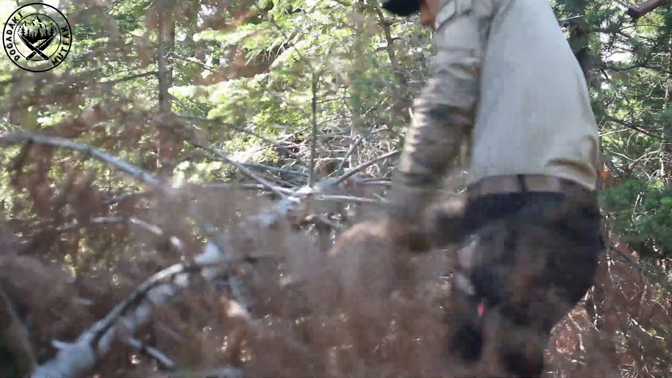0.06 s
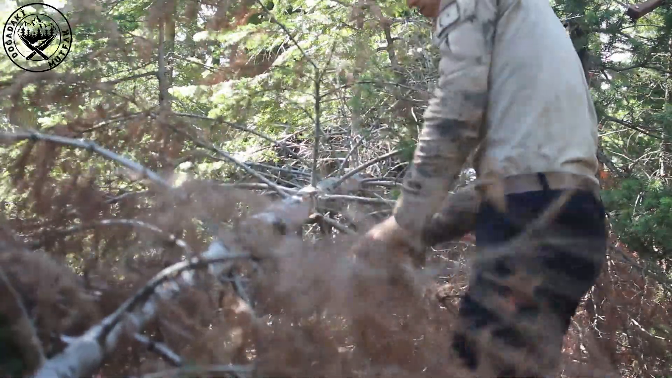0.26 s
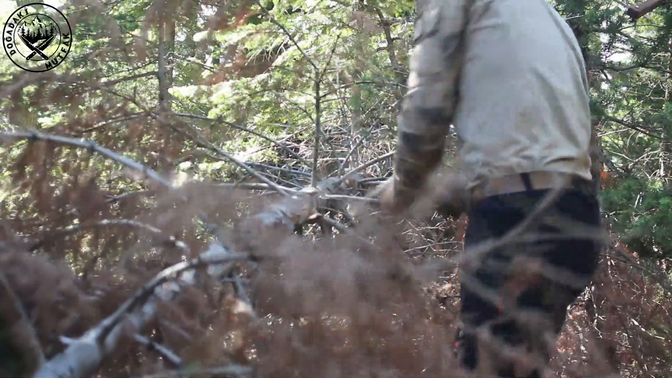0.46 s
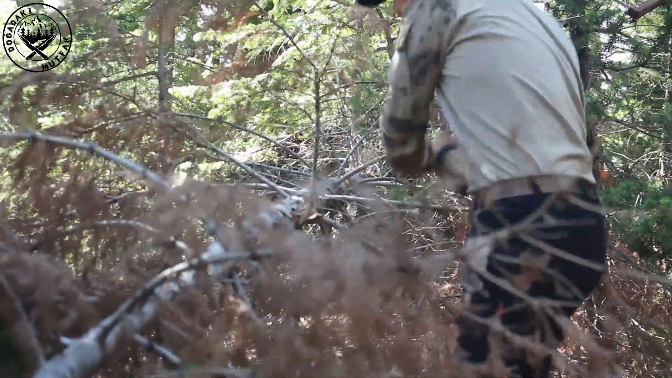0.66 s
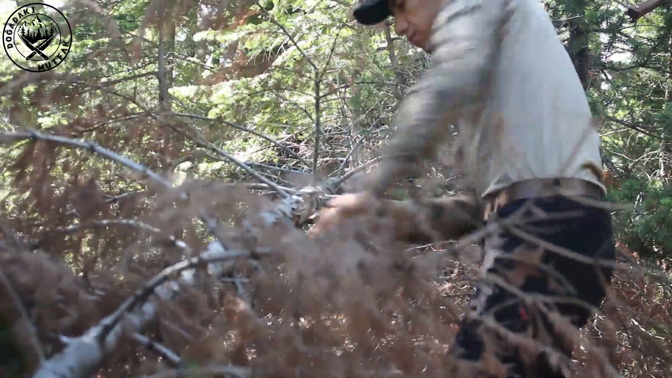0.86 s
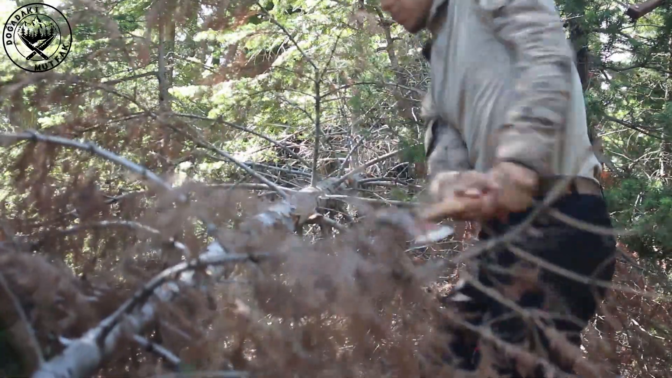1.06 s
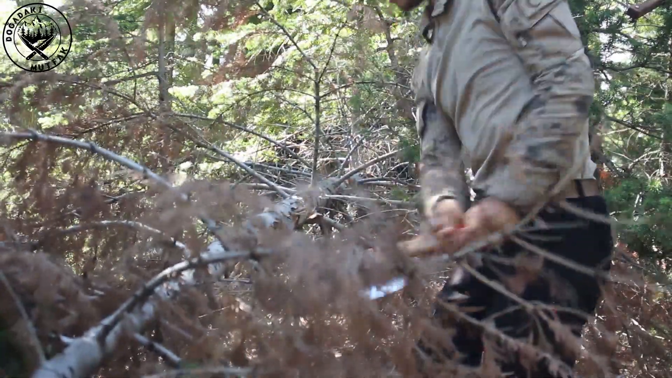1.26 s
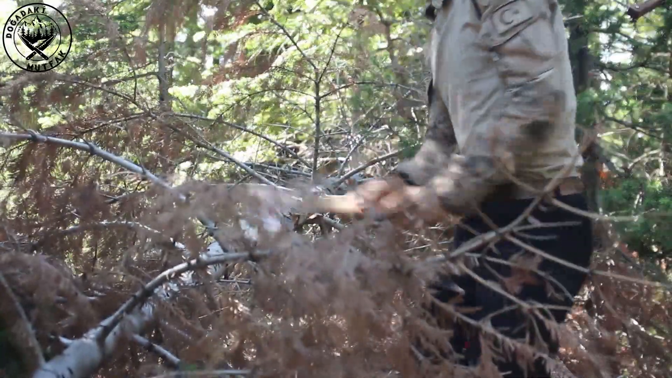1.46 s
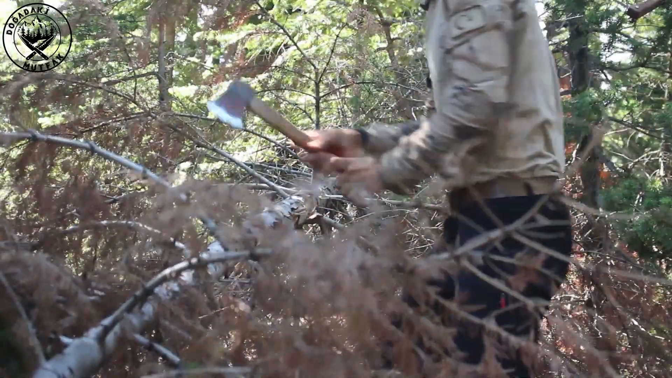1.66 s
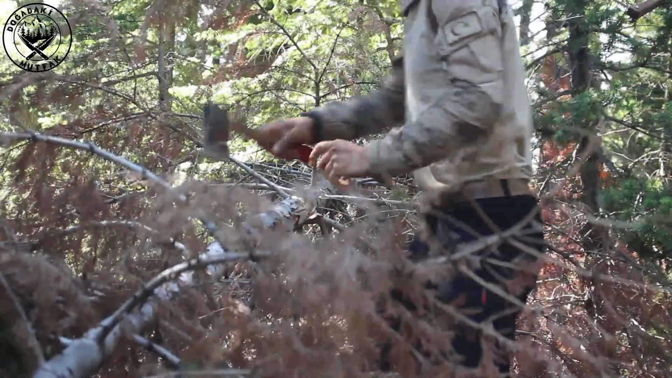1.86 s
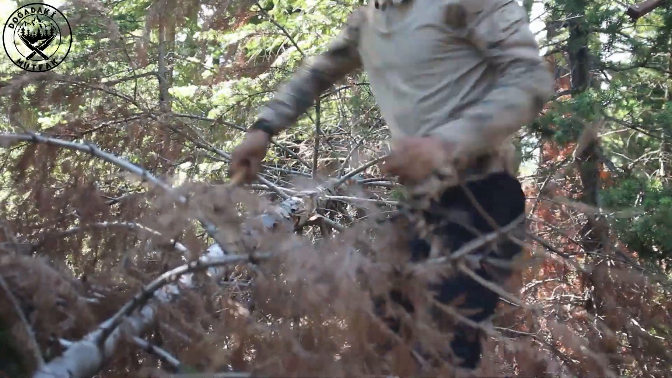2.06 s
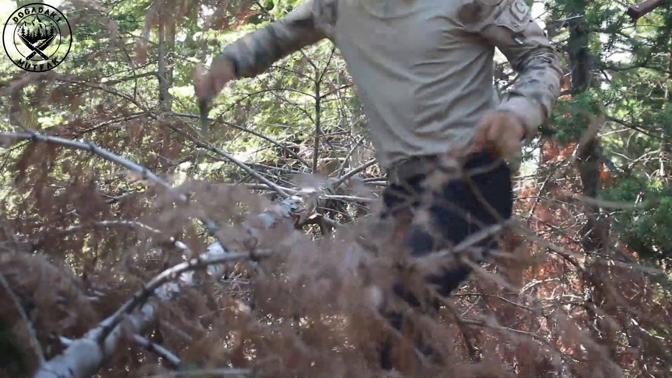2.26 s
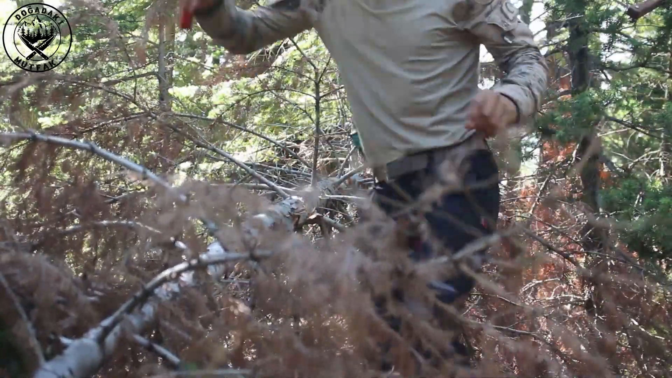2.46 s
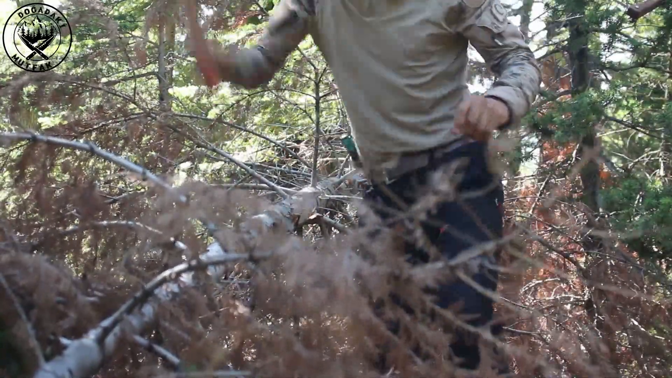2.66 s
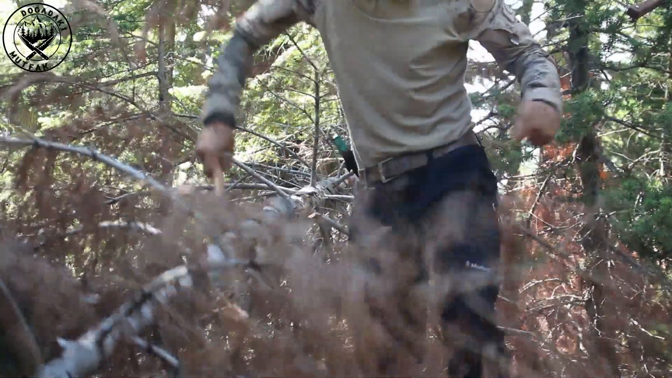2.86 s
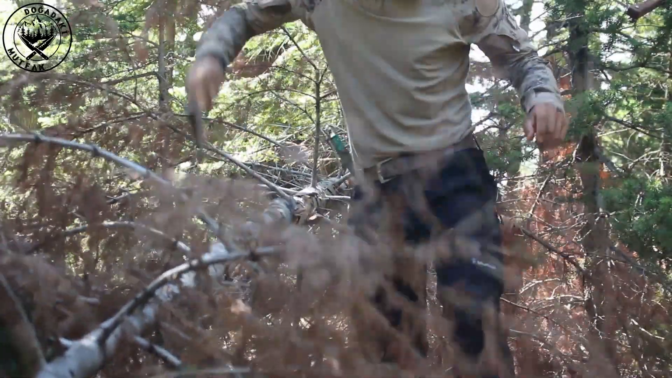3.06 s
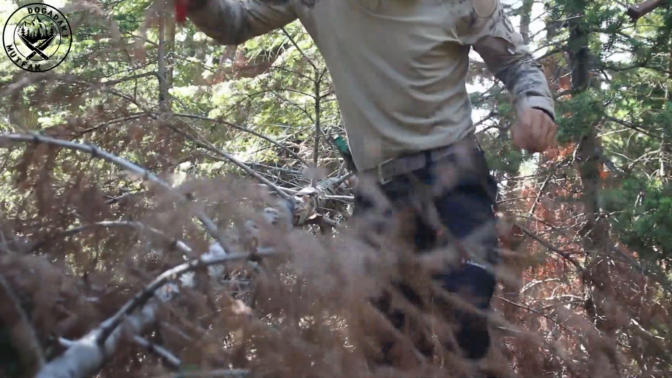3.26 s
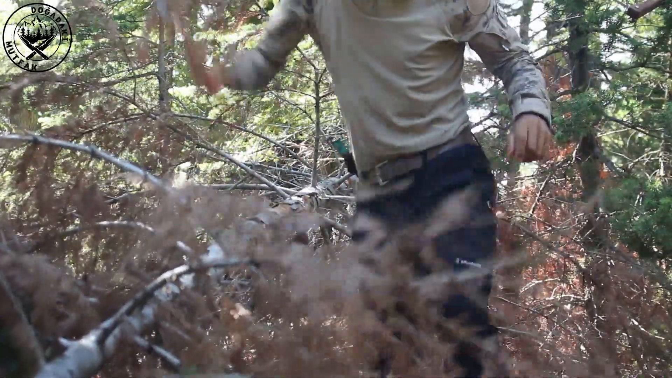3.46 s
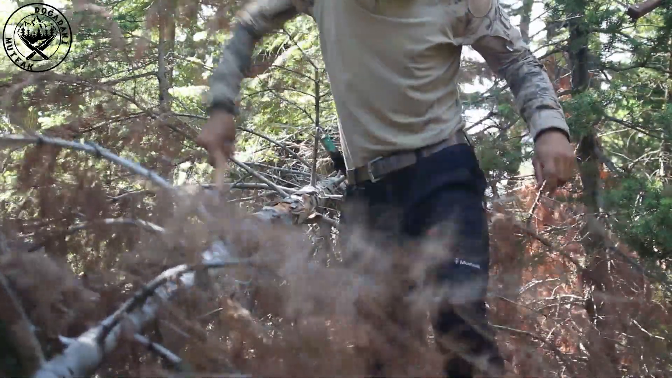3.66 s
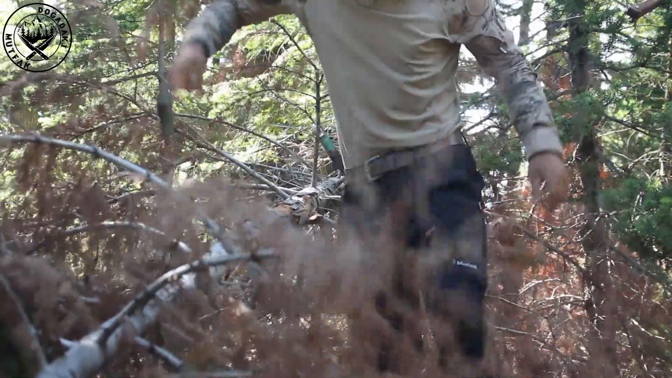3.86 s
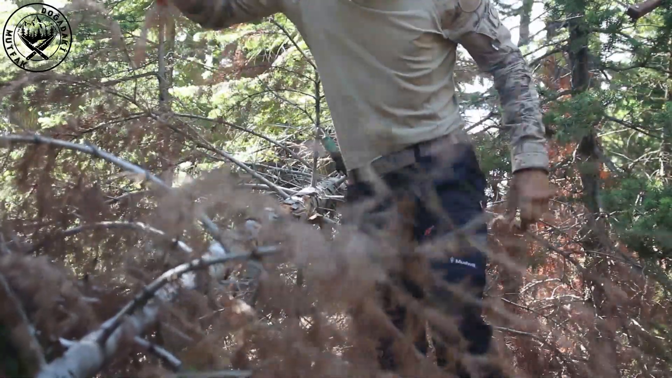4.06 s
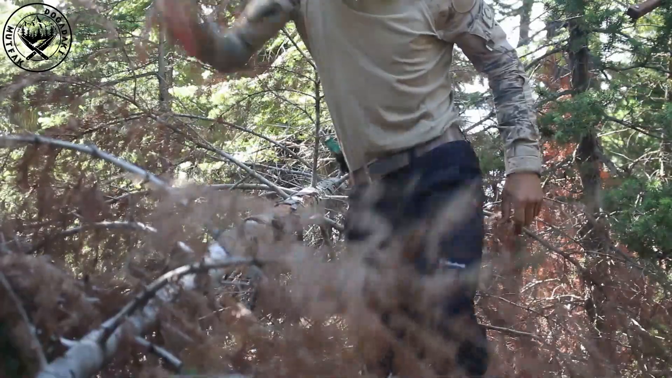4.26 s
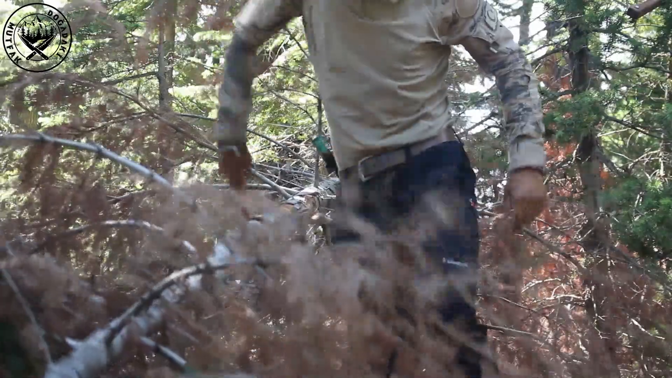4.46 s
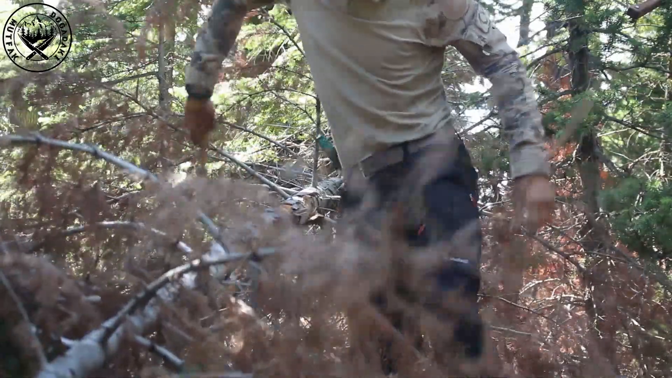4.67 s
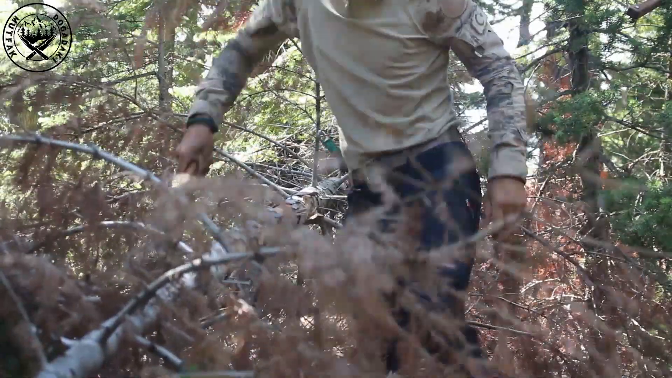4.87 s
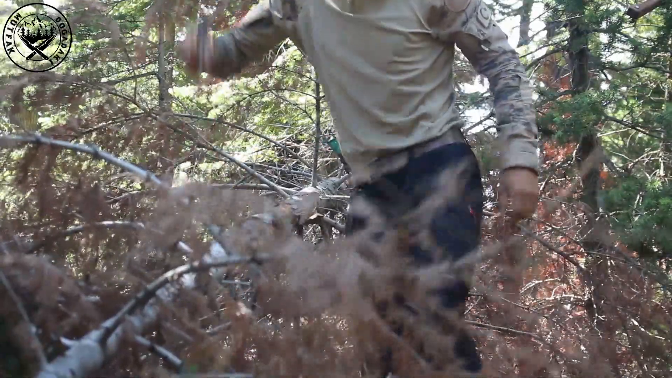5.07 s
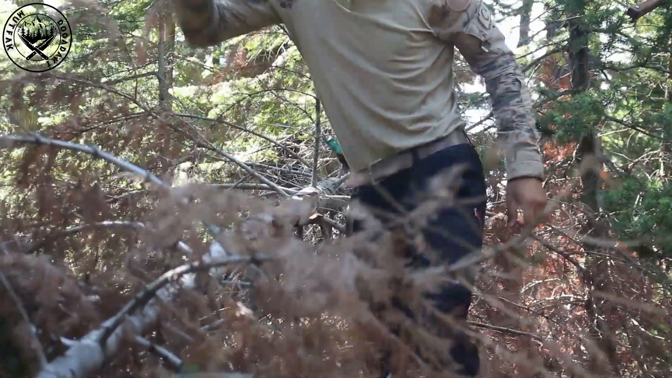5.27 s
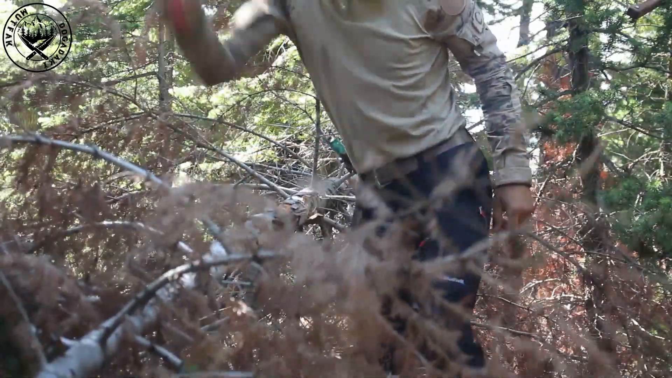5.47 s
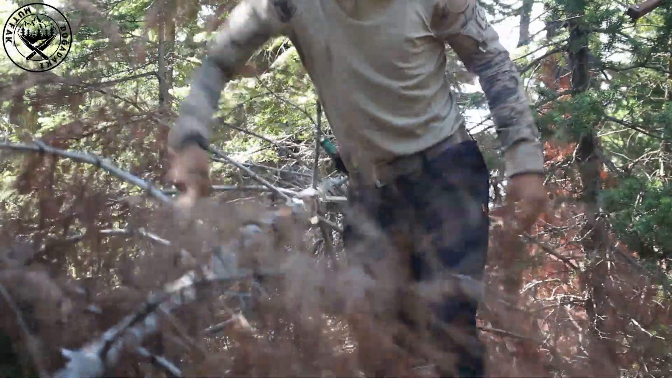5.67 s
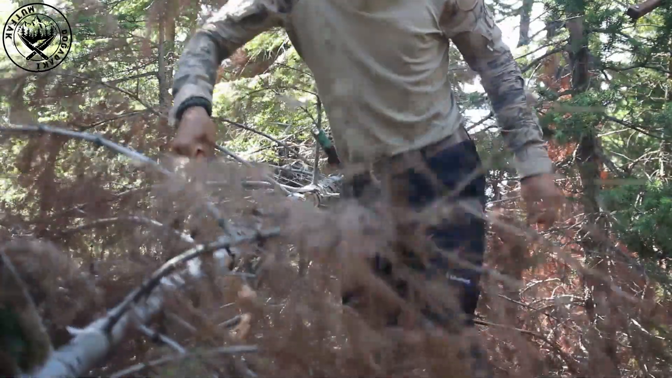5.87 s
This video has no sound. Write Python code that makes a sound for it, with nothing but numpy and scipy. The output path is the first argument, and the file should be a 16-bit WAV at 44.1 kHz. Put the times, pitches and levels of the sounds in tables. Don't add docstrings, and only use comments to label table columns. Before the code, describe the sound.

Six hard, cracking hatchet chops on a dry fallen tree echo briefly among trunks, with small twig snaps, ticking chips and thin bird whistles.

```python
import sys
import numpy as np
from scipy import signal
from scipy.io import wavfile
from scipy.ndimage import uniform_filter1d

SR = 44100
rng = np.random.default_rng(int(sys.argv[2]) if len(sys.argv) > 2 else 0)


def gain_from_decibels(decibels):
    exponent = np.asarray(decibels, float) / 20
    return 10 ** exponent


def store_wav(level_fs):
    pcm = np.round(np.clip(np.atleast_2d(level_fs), -1, 1) * 32767)
    wavfile.write(sys.argv[1], SR, pcm.T.astype(np.int16))


N = 260631

BANDS_HZ = 22 * 2 ** np.arange(0, 10, .5)
# f/Hz, level/dB, t60/s
HEAD_MODES = [(3680, -31, .3), (3790, -35, .2), (4690, -37, .2), (7860, -39, .3), (7990, -41, .25)]
# t/s, level/dB, wood resonance f/Hz, resonance level/dB, steel level/dB
SENT_ROUND = [
    (.106, 9, 1580, 5.5, 0),
    (.165, -11, 1510, 15, -4),
    (0.967, 7, 1480, 10, 2),
    (2.848, 11, 1230, 2.5, -11.5),
    (3.634, 10.5, 1250, 8, -11),
    (4.469, 10.5, 875, -9, -8),
    (5.676, 11, 1400, 5.5, -4.5),
]


def at_hz(points, hz):
    points = np.array(points)
    return np.interp(np.log(hz), np.log(points[:, 0]), points[:, 1])


def band(x, low_hz, high_hz):
    edges_hz = [max(low_hz, 15), min(high_hz, SR * .45)]
    return signal.sosfilt(signal.butter(2, edges_hz, "band", fs=SR, output="sos"), x)


def resonance(x, hz, q):
    return signal.lfilter(*signal.iirpeak(hz, q, fs=SR), x)


def dulled(x, hz):
    return signal.lfilter(*signal.butter(1, hz, fs=SR), x)


def drift(rate_hz):
    points = rng.standard_normal(500)
    return np.interp(np.arange(N) / SR * rate_hz, np.arange(500), points)


def pair(mid, side, alike):
    alike = np.clip(alike, -1, 1)
    return np.sqrt((1 + alike) / 2) * mid + np.sqrt((1 - alike) / 2) * side * [[1], [-1]]


def add(track, s, sound):
    i = int(s * SR)
    track[..., i:i + sound.shape[-1]] += sound[..., :N - i]


def banded(spectrum, sources, likeness, patchy_db):
    out = 0
    for k, (low_hz, high_hz) in enumerate(zip(BANDS_HZ, BANDS_HZ[1:])):
        hz = np.sqrt(low_hz * high_hz)
        mid, side = band(sources[k % 2], low_hz, high_hz)
        level = gain_from_decibels(at_hz(spectrum, hz) + patchy_db * drift(5.2))
        out = out + level * pair(mid, side, at_hz(likeness, hz))
    return out / np.sqrt(np.mean(out.mean(axis=0) ** 2))


def wind():
    # f/Hz, density/dB
    wind_colour = [(18, -22), (30, -25), (64, -9), (189, -7), (371, -4), (1120, -10.5), (2000, -15),
                   (15800, -29.5)]
    # f/Hz, left-right likeness
    wind_likeness = [(60, -0.115), (240, 0.25), (950, 0.24), (3770, -0.14), (15000, -0.37)]
    sources = rng.standard_normal((2, 2, N))
    return gain_from_decibels(-49.5 - 5.5) * banded(wind_colour, sources, wind_likeness, patchy_db=-2.3)


def rustle():
    # t/s, level/dB
    stirring = [(0.0, -68), (0.57, -63.5), (0.85, -69.5), (1.5, -69), (1.78, -63), (1.94, -64),
                (2.08, -58.5), (2.25, -61.5), (2.4, -68.5), (2.55, -64), (2.85, -70), (3.42, -64.5),
                (3.7, -77), (4.28, -67.5), (4.84, -65), (5.05, -67.5), (5.27, -78), (5.91, -66.5)]
    # f/Hz, density/dB
    needle_colour = [(180, -25), (300, -5), (354, -6), (543, -1), (650, 2), (1070, -1.5), (4720, -1.5),
                     (15500, -19.5)]
    chance = 1800 * gain_from_decibels(3.0 * drift(14)) / SR
    clicks = rng.random((2, 1, N)) < chance
    clicks = clicks * gain_from_decibels(3.2 * np.minimum(rng.exponential(1, (2, 1, N)), 2.5))
    sources = rng.standard_normal((2, 2, N)) * (0.21 + clicks)
    stir_s, stir_db = np.transpose(stirring)
    level = gain_from_decibels(np.interp(np.arange(N) / SR, stir_s, stir_db))
    shake_db, shake_peak_s, sharpness = -77, 0.11, 0.96
    u = np.arange(SR) / SR / shake_peak_s
    shake = (u * np.exp(1 - u)) ** sharpness
    for s, db, *_ in SENT_ROUND:
        add(level, s, gain_from_decibels(db + shake_db) * shake)
    likeness = [(300, 0.96), (12000, 0.39)]
    return level * gain_from_decibels(9.5) * banded(needle_colour, sources, likeness, patchy_db=2.0)


def fractures(rows, grain_db, alike, woody_db):
    out, t_ms = np.zeros((2, N)), np.arange(8000) / SR * 1000
    draws = rng.standard_normal((len(rows), 3, 8000))
    for (s, db, hz, octaves, rise_ms, t60_ms), (mid, side, size) in zip(rows, draws):
        grains = gain_from_decibels(grain_db * np.clip(size, -2, 2)) * pair(mid, side, alike)
        decay = gain_from_decibels(-60 * np.maximum(t_ms - rise_ms, 0) / t60_ms)
        shape = np.minimum(t_ms / rise_ms, 1) ** 2 * decay
        shaped = shape * band(grains, hz * 2 ** (-octaves / 2), hz * 2 ** (octaves / 2))
        rms = np.sqrt(np.mean(shaped ** 2) / np.mean(shape ** 2))
        burst = gain_from_decibels(db) * shape * (shaped / np.maximum(shape, 1e-30)) / (2 * rms)
        burst = burst + gain_from_decibels(woody_db) * resonance(burst, hz, 5.0)
        add(out, s, dulled(burst, 9500))
    return out


def staged(*stages):
    return [row + shape for shape, rows in stages for row in rows]


def tearing():
    # width/octaves, rise/ms, t60/ms
    touch_shape = (1.94, 2.5, 23)
    crack_shape = (2.7, 1.4, 20)
    split_shape = (2.63, 3, 78.6)
    crush_shape = (2.36, 4.3, 63)
    sag_shape = (3.06, 6.2, 390)
    # t/s, peak level/dB, centre f/Hz
    touches = [
        (.9480, -27, 1200),
        (2.8420, -13.5, 1770),
        (3.6289, -10.5, 2070),
        (4.4599, -18.5, 1580),
        (5.6700, -17.5, 1800),
        (2.4660, -28, 4070),
    ]
    # t/s, peak level/dB, centre f/Hz
    wood_cracks = [
        (0.1061, -2, 4630),
        (0.1614, -23.5, 8800),
        (0.9523, -15.5, 4170),
        (.9680, -2, 4000),
        (2.8001, -20, 1510),
        (3.6335, -8, 3400),
        (4.4650, -6.5, 5250),
        (4.471, -10.5, 6060),
        (5.676, -16.5, 5300),
    ]
    # t/s, peak level/dB, centre f/Hz
    splits = [
        (0.0984, -13.5, 2890),
        (.1110, -16.5, 3020),
        (0.1592, -21, 3000),
        (.9580, -11.5, 2480),
        (.9720, -18.5, 3300),
        (2.088, -28.5, 3780),
        (2.8471, -14, 3770),
        (3.632, -16, 2200),
        (4.4640, -11.5, 1390),
        (5.676, -16.5, 2280),
    ]
    # t/s, peak level/dB, centre f/Hz
    crushes = [(.1030, -12.5, 633), (.9670, -17, 444), (2.0920, -30, 880), (2.469, -29, 2200),
               (2.846, -14, 533), (3.6310, -13, 570), (5.6744, -6.5, 730), (.9620, -16, 800),
               (4.4700, -16, 300), (2.1040, -29.5, 250), (2.4400, -38.5, 607), (2.497, -32.5, 704)]
    # t/s, peak level/dB, centre f/Hz
    sags = [
        (0.166, -23.5, 2540),
        (2.802, -43, 3000),
        (4.4850, -27.5, 835),
    ]
    rows = staged((touch_shape, touches), (crack_shape, wood_cracks), (split_shape, splits),
                  (crush_shape, crushes), (sag_shape, sags))
    return fractures(rows, grain_db=2.0, alike=0.8, woody_db=3.5)


def bending(rows, narrow, wobble):
    out, t = np.zeros(N), np.arange(4000) / SR
    sink_octaves_per_ms, sink_at_hz = 0.038, 260
    draws = rng.standard_normal((len(rows), 2, 200))
    for (s, db, hz, swell_ms), (pitch, size) in zip(rows, draws):
        cycle = np.minimum(t * hz, 199)
        u = t * 1000 / swell_ms
        uneven = wobble * np.interp(cycle, np.arange(200), pitch)
        sunk = np.minimum(sink_octaves_per_ms * sink_at_hz / hz * t * 1000, 1.3)
        phase = 2 * np.pi * np.cumsum(hz * 2 ** (uneven - sunk)) / SR
        strength = gain_from_decibels(db + 18.7 * wobble * np.interp(cycle, np.arange(200), size))
        add(out, s, strength * (u * np.exp(1 - u)) ** narrow * np.sin(phase))
    return out


def wood_knocks():
    # t/s, peak level/dB, f/Hz, swell/ms
    bites = [(.1018, -12, 1360, 1.8), (.1050, -17, 880, 2.9), (.1065, -1.5, 2080, 0.94),
             (.1090, -15, 1340, 2.5), (.1585, -18, 1560, 0.99), (.1605, -13, 590, 1.5),
             (.9640, -8.5, 1400, 2.5), (.9690, -14.5, 1176, 3.2), (.9730, -6, 1600, 1.13),
             (.9810, -27, 1400, 3), (1.854, -31, 470, 1.6), (2.0520, -21, 514, 1.45),
             (2.0585, -33.5, 490, 1), (2.0955, -22, 295, 2.6), (2.8440, -9.5, 1356, 3.1),
             (2.8485, -10.5, 1190, 2.1), (2.8520, -12.5, 1500, 1.9), (2.8475, -11.5, 289, 4.3),
             (3.6298, -6.5, 1207, 3.2), (3.6335, -0.5, 1270, 0.98), (3.6375, -11, 1400, 3.3),
             (4.4632, -10, 619, 3.1), (4.4690, -32, 1567, 2), (4.4790, -12.5, 427, 3.1),
             (4.545, -31, 703, 6.3), (5.6720, -7, 1306, 1.8), (5.6765, -8.5, 1344, 2),
             (5.6770, -9.5, 456, 0.8), (1.716, -47, 4800, 5.6), (1.8655, -35.5, 2150, 2.8)]
    return bending(bites, narrow=3.2, wobble=.06)


def trunk_thumps():
    # t/s, peak level/dB, f/Hz, swell/ms
    trunk_waves = [(.102, -16.5, 350, 1.64), (.116, -24, 260, 9), (.170, -27, 245, 8.8),
                   (.975, -24, 326, 3.7), (2.104, -29, 326, 11), (2.438, -40.5, 228, 8.8),
                   (2.494, -29, 260, 3.9), (2.856, -19, 251, 11.3), (3.646, -19, 239, 7.1),
                   (4.480, -30.5, 240, 9.5), (5.686, -11.5, 243, 9.2)]
    return bending(trunk_waves, narrow=3.55, wobble=0.19)


def steel():
    # t/s, level/dB, free ringing/s
    head_blows = [
        (.107, 2, 0.054),
        (.969, -3, 0.1),
        (2.85, -12, 0.089),
        (3.635, -22, 0.078),
        (4.468, -6, .05),
        (5.678, -23, 0.055),
    ]
    out, t = np.zeros(N), np.arange(12000) / SR
    ring = sum(gain_from_decibels(db - 60 * t / t60_s) * np.sin(2 * np.pi * hz * t) for hz, db, t60_s in HEAD_MODES)
    for s, db, free_s in head_blows:
        damping_db = 3000 * np.maximum(t - free_s, 0)
        add(out, s, gain_from_decibels(db - damping_db) * ring)
    return out


def sent_round():
    out, click = np.zeros(N), np.eye(1, 600)[0]
    broad = dulled(click, 5360)
    steely = sum(resonance(click, mode_hz, 22) for mode_hz, *_ in HEAD_MODES[:3:2])
    for s, db, hz, resonance_db, steel_db in SENT_ROUND:
        woody = resonance(click, hz, 2.6)
        add(out, s, gain_from_decibels(db) * (broad + gain_from_decibels(resonance_db + 3) * woody + gain_from_decibels(steel_db) * steely))
    return out


def forest(x):
    # f/Hz, level/dB, t60/s
    echo_bands = [(87, -6.5, 0.51), (186, -6, 0.22), (358, -13.5, 0.57), (700, -14, 0.98),
                  (1400, -13.5, 0.67), (2750, -14.5, 0.82), (6000, -11, 0.56), (9250, -16.5, 1),
                  (14000, -13.5, 0.35)]
    # f/Hz, left-right likeness
    echo_likeness = [(60, 0.83), (180, 1), (550, 0.96), (1650, 0.68), (4970, 0.37), (15000, -0.49)]
    t, response = np.arange(SR) / SR, 0
    echoes, size = rng.standard_normal((2, SR)), rng.standard_normal(SR)
    clumps = uniform_filter1d(size, size=600) * np.sqrt(600)
    echoes = echoes * gain_from_decibels(3.05 * size + 0.95 * clumps)
    stand_s, stand_width_s, stand_db = 0.069, 0.019, 3.5
    stand = gain_from_decibels(stand_db * np.exp(-((t - stand_s) / stand_width_s) ** 2))
    build = np.clip((t - .006) / 0.017, 0, 1) * stand
    for k, (low_hz, high_hz) in enumerate(zip(BANDS_HZ, BANDS_HZ[1:])):
        hz = np.sqrt(low_hz * high_hz)
        db = at_hz(echo_bands, hz)
        t60_s = at_hz(np.array(echo_bands)[:, ::2], hz)
        mid, side = band(echoes, low_hz, high_hz) * (-1) ** k
        response = response + gain_from_decibels(db - 60 * t / t60_s) * build * pair(mid, side, at_hz(echo_likeness, hz))
    return gain_from_decibels(-28.5) * signal.fftconvolve(x[None], response, axes=1)[:, :N]


def twig_snaps():
    # width/octaves, rise/ms, t60/ms
    snap_shape = (4.1, .35, 14)
    tick_shape = (2.0, .45, 20)
    tip_shape = (1.9, .4, 14)
    # t/s, peak level/dB, centre f/Hz
    breaks = [(.2444, -21.5, 2130), (.6443, -30.5, 2680), (.7019, -32.5, 3340), (.777, -29.5, 2010),
              (1.0857, -21, 2380), (1.1282, -21.5, 2640), (1.255, -30, 2200), (1.8539, -21.5, 2640),
              (2.1829, -26, 2250), (2.5365, -24.5, 2300), (2.5808, -34, 3300), (3.4829, -38.5, 2280),
              (4.8152, -29.5, 2130), (4.8381, -23.5, 8600), (4.9056, -36, 3540), (2.8012, -20, 2210)]
    # t/s, peak level/dB, centre f/Hz
    ticks = [(.5356, -38.5, 2030), (.582, -39, 1830), (1.3735, -31, 3550), (1.4307, -38, 1000),
             (1.7042, -33.5, 2420), (1.7465, -32.5, 1680), (1.8137, -38, 3970), (1.8649, -26.5, 2220),
             (2.012, -35, 5300), (2.04, -33, 4090), (2.0509, -31, 2580), (2.2454, -42, 2400),
             (2.2692, -40, 1780), (2.4937, -26.5, 3500), (3.9079, -30, 2980), (4.0794, -44.5, 3500),
             (4.914, -29.5, 3960), (4.9232, -32, 3020), (4.9578, -26, 5600), (4.987, -39, 2140),
             (5.0141, -33, 4250), (5.2266, -37, 2330), (5.8737, -28.5, 1770), (5.0110, -34, 590),
             (4.9110, -32.5, 2200), (5.296, -46, 3000), (2.476, -23.5, 2600), (2.485, -33, 4200)]
    # t/s, peak level/dB, centre f/Hz
    tips = [
        (1.174, -36, 6400),
        (3.1350, -41, 12100),
        (3.8174, -41, 5530),
        (4.6333, -46, 5400),
        (4.7575, -36, 7900),
        (4.9368, -38, 8000),
        (5.0694, -43, 8460),
        (5.5554, -40, 7000),
    ]
    rows = staged((snap_shape, breaks), (tick_shape, ticks), (tip_shape, tips))
    return fractures(rows, grain_db=6.5, alike=0.87, woody_db=4)


def birds():
    # t/s, length/s, first f/Hz, last f/Hz, level/dB
    arched = [
        (3.303, .124, 7150, 7200, -61),
        (5.460, .110, 6550, 6600, -53),
        (5.460, .108, 7450, 7500, -58),
        (5.640, .100, 6700, 6750, -53),
    ]
    # t/s, length/s, first f/Hz, last f/Hz, level/dB
    slid = [(2.29, .045, 7300, 7200, -66), (2.415, .03, 8400, 8300, -67), (2.385, .105, 7250, 6950, -60),
            (3.095, .060, 7600, 7650, -58), (3.150, .055, 7650, 7400, -65), (3.155, .055, 7450, 6400, -60),
            (3.335, .055, 7600, 7200, -63), (3.380, .048, 7250, 6400, -56), (4.875, .040, 7200, 7300, -68),
            (4.88, .050, 8450, 8200, -67), (5.26, .115, 6800, 7000, -64), (5.378, .037, 6950, 6900, -69),
            (5.643, .060, 8350, 7800, -59)]
    out, flutter = np.zeros(N), drift(80) + drift(45)
    warble_hz = 45 * drift(70)
    for notes, arch_hz, squareness in (arched, 680, 5), (slid, 200, 2):
        for s, length_s, first_hz, last_hz, db in notes:
            u = np.linspace(0, 1, int(length_s * SR))
            arch = arch_hz * (1 - np.abs(2 * u - 1) ** squareness)
            hz = first_hz + (last_hz - first_hz) * u + arch + warble_hz[int(s * SR):][:len(u)]
            edges = np.minimum(np.minimum(u, 1 - u) * length_s / .012, 1)
            add(out, s, np.sqrt(2) * gain_from_decibels(db) * edges * np.sin(2 * np.pi * np.cumsum(hz) / SR))
    return out * gain_from_decibels(2.4 * flutter)


def scene():
    thumps = trunk_thumps()
    blows = (wood_knocks() + thumps + steel()) * gain_from_decibels([[1.5], [-1.6]])
    blows = blows + tearing() * gain_from_decibels([[.8], [-.8]])
    twigs = twig_snaps() * gain_from_decibels([[-2.5], [-3.5]])
    song = birds()
    sent = sent_round() + gain_from_decibels(-19) * blows.mean(axis=0) + gain_from_decibels(-13) * thumps
    sent = sent + gain_from_decibels(-9.5) * twigs.mean(axis=0) + gain_from_decibels(-6) * song
    direct = blows + twigs + song * gain_from_decibels([[.3], [-.3]])
    scattered = forest(sent) * gain_from_decibels([[1.2], [-1.2]])
    return direct + scattered + rustle() * gain_from_decibels([[.6], [-.6]]) + wind() * gain_from_decibels([[.4], [-.4]])


def band_limit(x):
    return signal.sosfilt(signal.butter(12, 15940, fs=SR, output="sos"), x)


def record(dry):
    heard = dry + gain_from_decibels(-72) * rng.standard_normal(dry.shape)
    heard = signal.sosfilt(signal.butter(2, 55, "high", fs=SR, output="sos"), heard)
    heard = signal.sosfilt(signal.cheby2(14, 50, 16600, fs=SR, output="sos"), heard)
    return band_limit(np.clip(heard, -1, 1))


dry = scene()
out = record(dry)
store_wav(out)
```